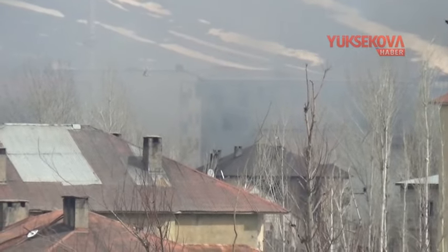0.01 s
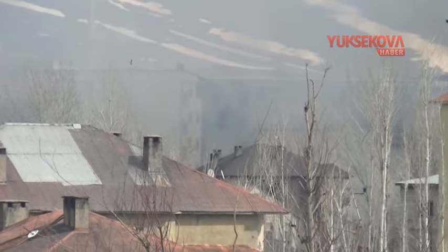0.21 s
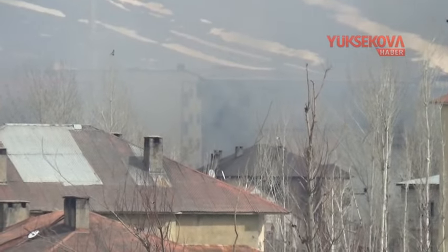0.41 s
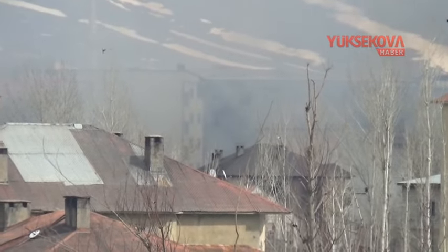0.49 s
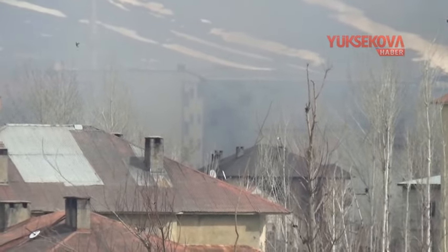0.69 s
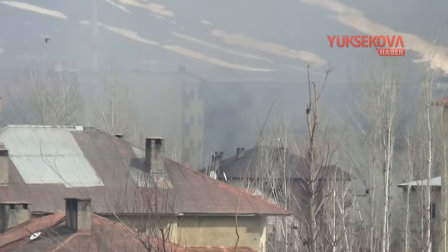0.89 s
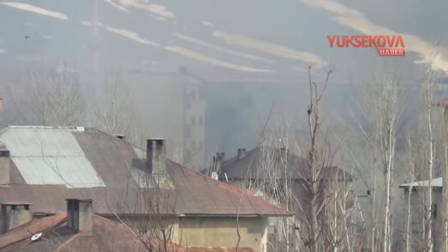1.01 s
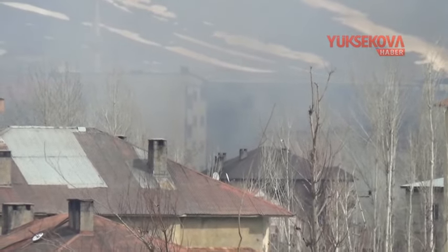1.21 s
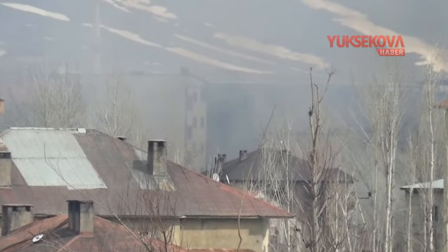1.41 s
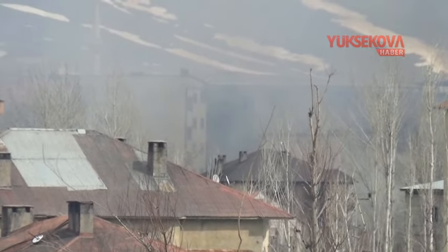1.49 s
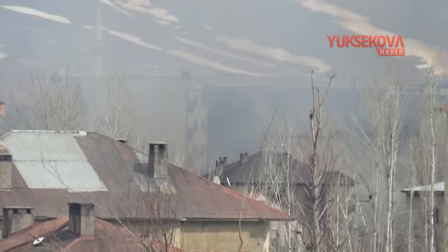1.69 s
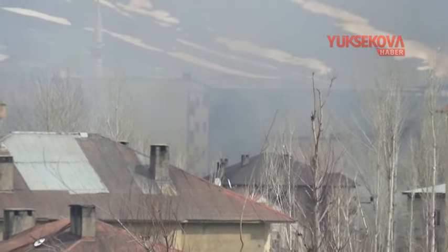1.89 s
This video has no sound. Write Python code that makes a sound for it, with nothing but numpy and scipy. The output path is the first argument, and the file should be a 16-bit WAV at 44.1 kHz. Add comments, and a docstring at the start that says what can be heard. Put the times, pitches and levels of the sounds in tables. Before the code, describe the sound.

A heavy distant explosion booms across a town, its rumbling echoes rolling on and fading away

```python
"""A town, with one heavy explosion far across it. The blast arrives as a dull thud, then as thousands of
reflections from walls and hills, random taps that roll on and darken; large faces return distinct booms.
A nearby building shudders in the bass (resonated noise), something ticks once (a decaying noise burst),
and a faint swell leads in over murmur and hiss (filtered noise). Gain control dips after loud arrivals,
and the loudest peaks are held back, then clipped where they still exceed full scale."""
import sys
import numpy as np
from scipy import signal
from scipy.fft import rfft, irfft
from scipy.io import wavfile
from scipy.ndimage import uniform_filter1d, minimum_filter1d

SR = 44100
rng = np.random.default_rng(int(sys.argv[2]) if len(sys.argv) > 2 else 0)


def wav_record(signal):
    """Record a signal, one row per channel, as 16-bit PCM in the file named by sys.argv[1]."""
    frames = np.transpose(np.atleast_2d(signal))
    bounded = np.clip(frames, -1, 1)
    # unit amplitude maps onto the largest positive 16-bit level
    quanta = np.round(bounded * 32767).astype(np.int16)
    wavfile.write(sys.argv[1], SR, quanta)


N = 88200
T = np.arange(N) / SR  # time [s]
BLAST_S = .1995  # arrival of the direct sound


def amp(db):
    """Decibel law: amplitude ratio of a level in dB."""
    return 10 ** (np.asarray(db) / 20)


def evened(x):
    """Normalisation: scales to an RMS of 1."""
    return x / np.sqrt(np.mean(x ** 2) + 1e-20)


def curve(table, order=1):
    """Linear interpolation: one column of a table followed over time."""
    rows = np.array(table)
    return np.interp(T, rows[:, 0], rows[:, order])


def panned(stereo, pan_db):
    """Level difference: leans left for positive dB; the mean of the two channel gains stays 1."""
    g = amp(pan_db)
    left_gain = 2 * g / (1 + g)
    right_gain = 2 / (1 + g)
    return np.array([stereo[0] * left_gain, stereo[1] * right_gain])


def noise_pair(same):
    """Interchannel coherence: two white noises whose correlation is `same`."""
    a, b = rng.standard_normal((2, N))
    same = np.clip(same, -1, 1)
    return np.array([a, same * a + np.sqrt(1 - same ** 2) * b])


def colour(x, points, size=8192):
    """Minimum phase: a causal filter of energy 1 whose phase follows from its log spectrum."""
    f, db = np.transpose(points)
    hz = abs(np.fft.fftfreq(size, 1 / SR))
    level_db = np.interp(np.log(hz + 1), np.log(f + 1), db, right=-100)
    log_gain = np.log(amp(level_db))
    spectrum = np.exp(np.conj(signal.hilbert(log_gain)))
    h = np.fft.ifft(spectrum).real[:size // 2]
    h = h / np.linalg.norm(h)
    return signal.oaconvolve(x, h[None], axes=1)[:, :N]


def resonate(x, hz, width):
    """Resonance: shifts the band to 0 Hz, smooths it with two equal poles and shifts it back."""
    turn = np.exp(2j * np.pi * hz * T)
    r = np.exp(-np.pi * width / SR)
    envelope = signal.lfilter([(1 - r) ** 2], [1, -2 * r, r * r], x / turn)
    return 2 * (turn * envelope).real


TAPS_PER_S, TAP_SPREAD_DB = 3000, 2.0  # mean density; mean of the exponential spread of levels
SCATTER_DB = -16  # taps private to one channel, against the shared ones


def reflections():
    """Diffuse reflection: sparse arrivals of random sign and size, mostly shared by both channels."""
    hit = rng.random((3, N)) < TAPS_PER_S / SR
    sign = np.sign(rng.standard_normal((3, N)))
    size = amp(TAP_SPREAD_DB * rng.exponential(1, (3, N)))
    taps = hit * sign * size
    return evened(taps[:1] + amp(SCATTER_DB) * taps[1:])


# Rolling mass of small reflections: (time [s], level [dB], left over right [dB])
ROLL = [(0.2, -13, 10), (0.23, -17.5, 6), (0.334, -13.5, 5.5), (0.666, -18.5, 4), (0.68, -16, 5),
        (0.806, -19.5, 5), (0.816, -17.5, 5.5), (1.006, -23.5, 3), (1.052, -18.5, 3.5), (1.126, -22.5, 2.5),
        (1.418, -27.5, 3.5), (1.618, -29, 5), (2.0, -32, 4)]
DIRECT_DB = 7.5  # the first, straight arrival
DARKEN_S = 0.79  # time constant of the fading bright share


def direct_and_roll():
    """Reverberant decay: the direct impulse and the roll, whose energy passes from short to long paths."""
    bright_share = np.exp(-np.maximum(T - BLAST_S, 0) / DARKEN_S)
    roll = amp(curve(ROLL)) * (T > BLAST_S) * reflections()
    direct = amp(DIRECT_DB) * (np.arange(N) == round(BLAST_S * SR))
    bright = bright_share * roll + direct
    dull = np.sqrt(1 - bright_share ** 2) * roll
    return bright, dull


# Distinct returns of the blast, the first at the direct sound, levels relative:
# (time [s], cluster level [dB], brightness [0-1], thud frequency [Hz], thud level [dB])
BOOMS = [(0.1989, -7.5, 1, 252, -6.5), (0.23, -4, 0.5, 257.4, -6.5), (.263, -12.5, 0.34, 217.6, 1),
         (0.277, -3, 0.03, 245, -9.5), (0.3, -1.5, 1, 261, -6), (.316, -23.5, 0.54, 221.5, 2.5),
         (0.364, -4.5, 0.5, 236, -12), (0.384, -1, 0.99, 314, -12), (0.413, -7, .5, 270, -0.5),
         (0.538, -5.5, 1, 361, -26), (0.574, -20.5, .3, 248, -7), (0.679, -10, 0.2, 325, -4.5),
         (0.707, -6, 0.46, 170, -5.5), (0.747, -15.5, 0.42, 173, -8), (0.814, -15, 0.2, 269, -3),
         (0.843, -7, 0.5, 250.5, -10), (.91, -20.5, 0.37, 199.5, -3), (1.018, -13, 0.6, 195, -11),
         (1.041, -12, 1, 242, -4), (1.055, -8, 1, 280, -16), (1.261, -39, 0.85, 269, -17.5),
         (1.661, -17.5, 0.1, 264.5, -20.5)]
BOOM_RISE_S, BOOM_T60_S = 0.0038, .15
THUD_RISE_S, THUD_T60_S = 0.0035, 0.081


def booms():
    """Specular echo: each large face returns a decaying cluster of arrivals and a low sine thud."""
    cluster = reflections()
    bright, dull, thuds = 0, 0, 0
    for s, db, brightness, hz, thud_db in BOOMS:
        t = np.maximum(T - s, 0)
        boom = np.minimum(t / BOOM_RISE_S, 1) * amp(db - 60 * t / BOOM_T60_S) * cluster / 2
        mix = np.clip(brightness, 0, 1)
        bright = bright + mix * boom
        dull = dull + np.sqrt(1 - mix ** 2) * boom
        thud_envelope = np.minimum(t / THUD_RISE_S, 1) * amp(thud_db - 60 * t / THUD_T60_S)
        thuds = thuds + thud_envelope * np.sin(2 * np.pi * hz * t)
    return bright, dull, thuds


# Faint resonances of the space around the microphones: (frequency [Hz], width [Hz], level [dB])
NEARBY = [(158.8, 10, 2), (249.5, 12, -12), (350, 10, -8.5), (481.8, 5.3, 0.5), (588, 18, -4),
          (774, 16, -4.5), (778, 38, -11), (1053, 48, -0.5), (1243, 4, -7), (1267, 66, -3.5),
          (2080, 14, -7)]


def nearby_ringing(x):
    """Sympathetic resonance: the space around the microphones rings when the blast drives it."""
    return sum(amp(db) * resonate(x, hz, width) for hz, width, db in NEARBY)


# Colour of a short path: (frequency [Hz], relative spectral level [dB])
BRIGHT = [(30, -50), (60, -11), (130, -11.5), (180, -2.5), (240, 1.5), (330, -3.5), (450, -8), (800, -7.5),
          (1100, -16), (1500, -23.5), (2200, -36.5), (3300, -52.5), (4500, -81), (6000, -100)]
# Colour of a long path: (frequency [Hz], relative spectral level [dB])
DULL = [(30, -52.5), (60, -6), (130, -9.5), (180, -3.5), (250, 1.5), (450, -6.5), (700, -8), (1050, -15.5),
        (1500, -25.5), (2000, -37.5), (2500, -53), (3200, -80)]


def blast():
    """Propagation loss: every arrival is the same blast, brighter by a short path, duller by a long one."""
    bright, dull = direct_and_roll()
    boom_bright, boom_dull, thuds = booms()
    arrivals = colour(bright + boom_bright, BRIGHT) + colour(dull + boom_dull, DULL)
    x = arrivals + thuds
    return panned(x + nearby_ringing(x), curve(ROLL, order=2))


# Course of the shudder: (time [s], level [dB])
SHUDDER = [(.2, -28), (.3, -37), (.4, -15.5), (.57, -20.5), (.75, -24.5), (.95, -25), (1.06, -25),
           (1.25, -28), (1.45, -38), (1.75, -46.5), (2.0, -51.5)]
# Low resonances of the building: (frequency [Hz], width [Hz], relative level [dB])
SHUDDER_BANDS = [(25, 15, -15.5), (48.6, 9.5, -5.5), (73.4, 14, 2), (87.1, 14, -3.5), (104.8, 9.3, -5.5),
                 (126.1, 9.4, -4)]
SHUDDER_PAN_DB, SHUDDER_SAME = 10, 0.84  # left over right; correlation of the driving noises


def shudder():
    """Structural modes: noise through a few low resonances of the nearby building."""
    x = 0
    for hz, width, db in SHUDDER_BANDS:
        x = x + amp(db) * evened(resonate(noise_pair(SHUDDER_SAME), hz, width))
    onset = np.clip((T - BLAST_S) / .03, 0, 1)
    return amp(curve(SHUDDER)) * onset * panned(evened(x), SHUDDER_PAN_DB)


# Resonances of the tick: (frequency [Hz], width [Hz], relative level [dB])
TICK = [(6130, 1200, -10), (8030, 3600, -5), (11800, 740, -6), (13160, 1500, -31.5)]
TICK_S, TICK_T60_S = .4589, 0.011  # start; decay time of the driving noise
TICK_DB = -25.5  # peak before panning


def tick():
    """Impulse excitation: a very short noise burst strikes four high resonances, close by and dry."""
    t = np.maximum(T - TICK_S, 0)
    snap = (T > TICK_S) * amp(-60 * t / TICK_T60_S) * noise_pair(0.99)
    x = sum(amp(db) * resonate(snap, hz, width) for hz, width, db in TICK)
    return amp(TICK_DB) * panned(x / abs(x).max(), 5.0)


LEAD_S = .188  # start of the faint swell just ahead of the blast
LEAD_DB, LEAD_HZ, LEAD_WIDTH_HZ = -27, 844, 270


def lead_in():
    """Narrow-band noise: a short swell up to the blast, uncorrelated between the two microphones."""
    rise = np.clip((T - LEAD_S) / (BLAST_S - LEAD_S), 0, 1) ** 0.5
    swell = rise * (T < BLAST_S)
    return amp(LEAD_DB) * swell * evened(resonate(noise_pair(0), LEAD_HZ, LEAD_WIDTH_HZ))


# Murmur of traffic and air: (frequency [Hz], relative spectral level [dB])
TOWN = [(18, -45.5), (30, -13), (125, -2), (173, -9.5), (223, 3), (667, -15), (809, -16.5), (1040, -11.5),
        (2040, -25), (3000, -38.5), (3900, -60), (6600, -120)]
# Thin hiss: (frequency [Hz], relative spectral level [dB])
HISS = [(1470, -28.5), (2500, 0.5), (3020, -5), (3270, -3), (4380, -3.5), (4780, -2.5), (7190, -2.5),
        (8320, -5.5), (12900, -6), (14300, -9)]
TOWN_DB, HISS_DB = -51.5, -61  # RMS before panning
FLOOR_SAME, FLOOR_PAN_DB = 0.83, 3  # correlation of the channels; left over right


def floor():
    """Stationary noise: low town murmur of traffic and air, and a thin hiss."""
    murmur = amp(TOWN_DB) * colour(noise_pair(FLOOR_SAME), TOWN)
    hiss = amp(HISS_DB) * colour(noise_pair(FLOOR_SAME), [(1500, -14)] + list(HISS))
    return panned(murmur + hiss, FLOOR_PAN_DB)


# Right microphone against the left: (frequency [Hz], gain [dB])
RIGHT_GAIN = [(20, 2), (40, 1.5), (58, -9.5), (80, 3), (105, 4.5), (132, -2), (165, -2.5), (300, -0.5),
              (740, -3), (1200, -2), (2600, -1), (4000, 0), (14000, -3)]
# Phase lag of the right microphone, a whole turn being none: (frequency [Hz], lag [turns])
RIGHT_LAG = [(0, 0), (21, .12), (43, .26), (64, .53), (86, .78), (107, 1), (120, 1.22), (130, 1.25),
             (140, 1), (22050, 1)]
LOW_CUT_HZ = 36


def microphones(x):
    """Transfer function: the right one has its own colour and bass lag; both lose the deepest bass."""
    size = 2 * N
    hz = np.fft.rfftfreq(size, 1 / SR)
    f, db = np.transpose(RIGHT_GAIN)
    gain = amp(np.interp(np.log(hz + 1), np.log(f + 1), db))
    lag = np.interp(hz, *np.transpose(RIGHT_LAG))
    response = gain * np.exp(-2j * np.pi * lag)
    right = irfft(rfft(x[1], size) * response, size)[:N]
    low_cut = signal.butter(2, LOW_CUT_HZ, "high", fs=SR, output="sos")
    return signal.sosfilt(low_cut, np.array([x[0], right]))


def scene():
    """Superposition: the pressures of all sources add."""
    return blast() + shudder() + tick() + lead_in() + floor()


DUCK_FROM_DB, DUCK_SHARE, DUCK_SENSE_S = -10.5, 0.35, 0.011  # threshold; dB cut per dB over; window
DUCK_RECOVER_DB_PER_S = 5.5  # fastest fall of the held level


def gain_control(x):
    """Compression: gain drops fast with the sensed level and recovers slowly."""
    size = round(DUCK_SENSE_S * SR)
    power = abs(uniform_filter1d((x ** 2).mean(0), size))
    power_db = 10 * np.log10(power + 1e-12)
    fall = T * DUCK_RECOVER_DB_PER_S
    held_db = np.maximum.accumulate(power_db + fall) - fall
    over_db = np.maximum(held_db - DUCK_FROM_DB, 0)
    return x / amp(DUCK_SHARE * uniform_filter1d(over_db, size))


PEAK_FROM, PEAK_SHARE, PEAK_S = .85, .6, .004  # threshold; exponent of the gain; window


def limiter(x):
    """Peak limiting: a brief gain dip around each peak takes off part of its excess."""
    size = round(PEAK_S * SR)
    room = minimum_filter1d(PEAK_FROM / np.maximum(abs(x).max(0), PEAK_FROM), size)
    smooth = uniform_filter1d(uniform_filter1d(room, size), size)
    return x * smooth ** PEAK_SHARE


CEILING = 1  # full scale
EDGE_HZ = 14150  # upper band limit


def record(dry):
    """Nonlinear chain: gain control, limiter, hard overload of what still gets through, band limit."""
    x = limiter(gain_control(microphones(dry)))
    clipped = np.clip(x, -CEILING, CEILING)
    low_pass = signal.firwin(255, EDGE_HZ, window=("kaiser", 9), fs=SR)
    limited = signal.oaconvolve(clipped, low_pass[None], "same")
    return np.clip(limited, -CEILING, CEILING)


dry = scene()
out = record(dry)
wav_record(out)
```